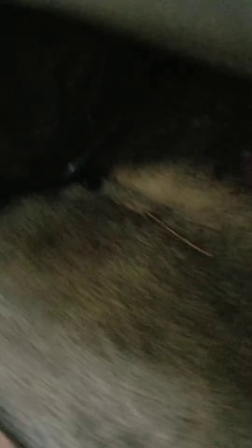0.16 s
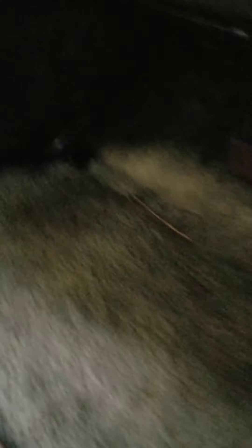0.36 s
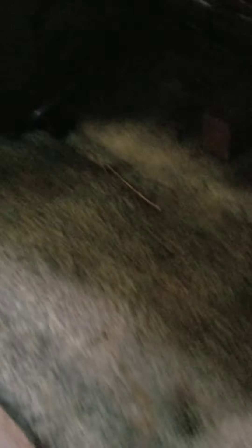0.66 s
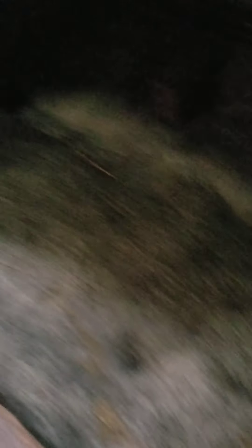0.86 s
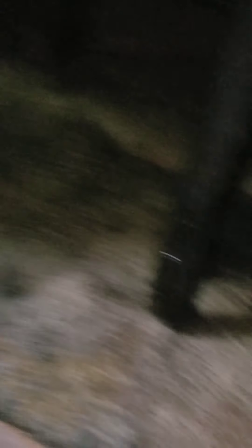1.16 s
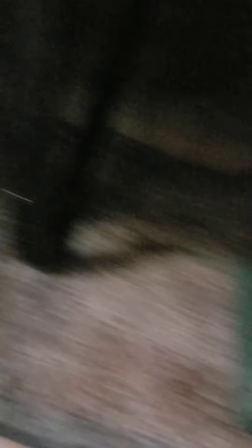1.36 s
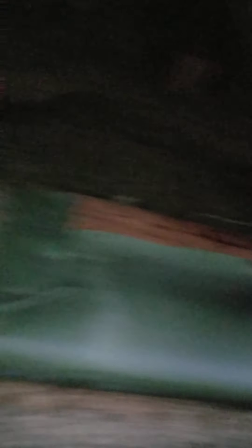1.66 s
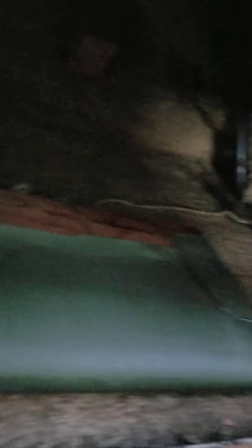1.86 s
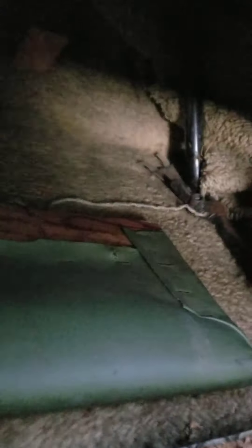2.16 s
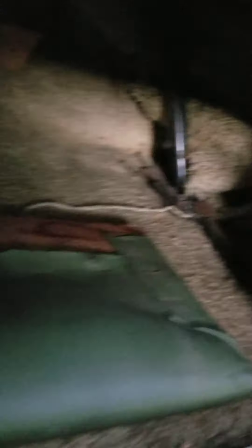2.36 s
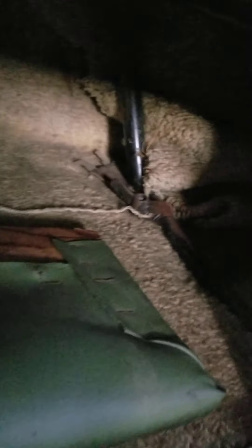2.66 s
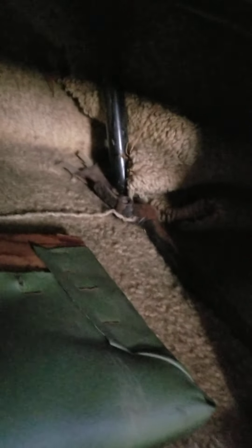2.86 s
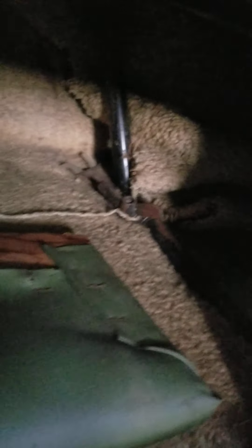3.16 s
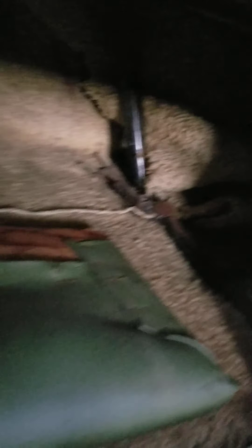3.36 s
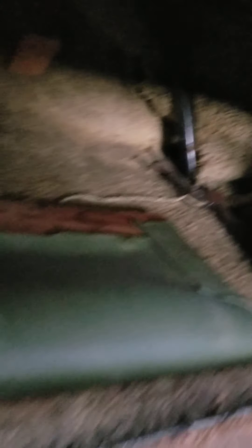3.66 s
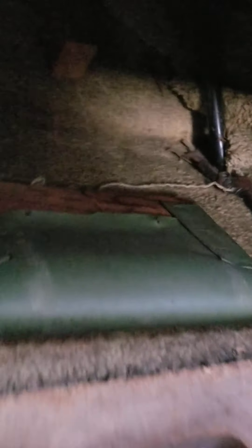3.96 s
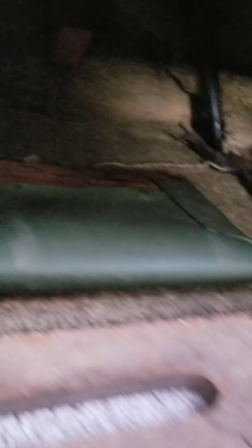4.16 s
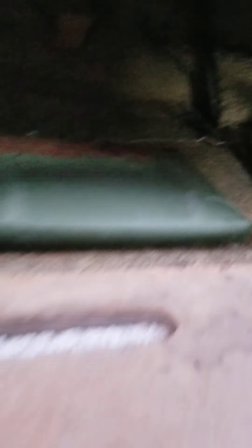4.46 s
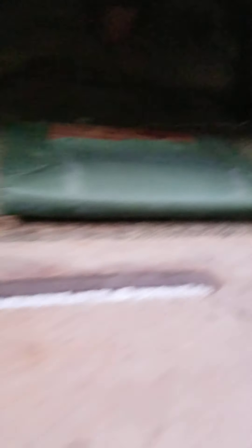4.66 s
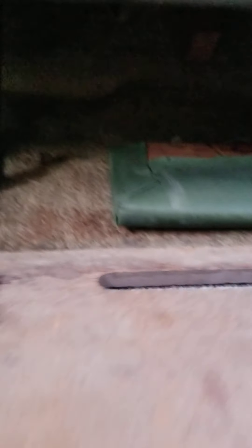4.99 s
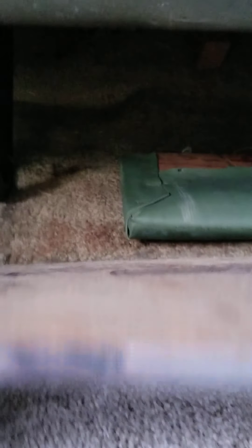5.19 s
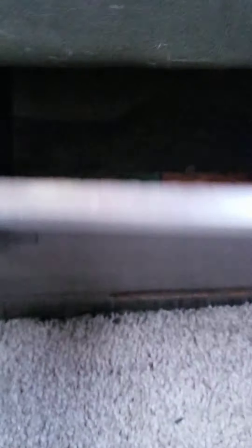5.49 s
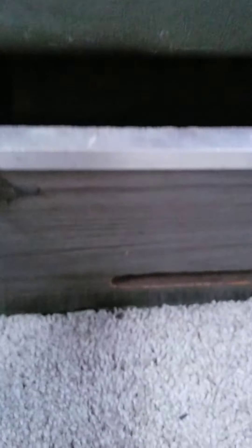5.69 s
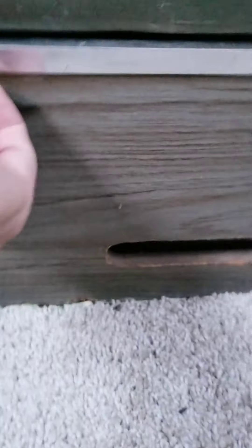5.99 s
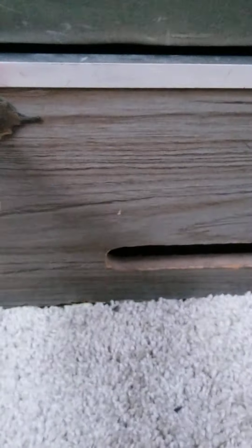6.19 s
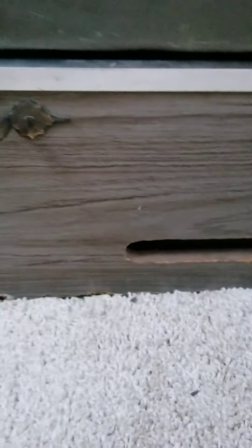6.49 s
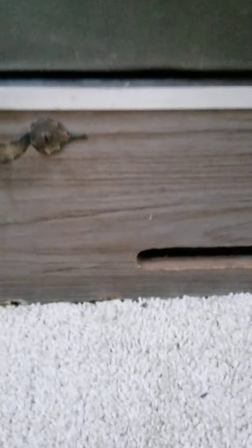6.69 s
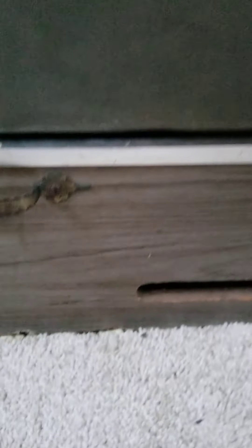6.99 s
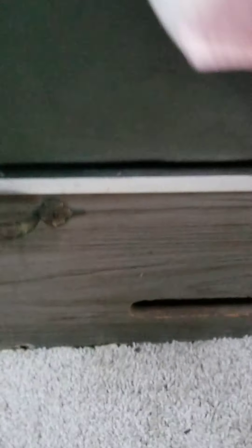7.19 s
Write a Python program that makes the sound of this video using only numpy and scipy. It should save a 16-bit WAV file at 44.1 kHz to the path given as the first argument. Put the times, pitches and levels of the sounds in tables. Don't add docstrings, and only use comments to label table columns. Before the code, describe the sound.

Inside a van, a four-cylinder air-cooled engine idles behind, a low booming rumble with busy knocking, tappet ticks and soft fan hiss. Fingers tap the phone's case near three seconds. The phone is drawn out of a low locker, then a wooden flap slams very close with a boomy thud and latch click. The idle continues, suddenly quieter as the phone lowers its gain.

```python
import sys
import numpy as np
from scipy import signal
from scipy.fft import rfft, irfft
from scipy.io import wavfile
from scipy.ndimage import uniform_filter1d

SR = 44100
rng = np.random.default_rng(int(sys.argv[2]) if len(sys.argv) > 2 else 0)


def waveform_to_disk(signal):
    frames = np.transpose(np.atleast_2d(signal))
    scaled = np.clip(frames, -1, 1) * 32767
    samples = np.round(scaled).astype(np.int16)
    wavfile.write(sys.argv[1], SR, samples)


def how_loud(loudness_db):
    steps = np.asarray(loudness_db, float) / 20
    return 10 ** steps


N = 323694
T = np.arange(N) / SR


def level(x, db=0):
    return x * how_loud(db) / np.sqrt(np.mean(x ** 2))


def ring(x, hz, width_hz):
    return signal.lfilter(*signal.iirpeak(hz, hz / width_hz, SR), x)


def colour(x, shape):
    hz, db = np.transpose(shape)
    bins = np.arange(N // 2 + 1) * SR / N + 1
    gain_db = np.interp(np.log(bins), np.log(hz), db, left=-90, right=-90)
    return irfft(rfft(x) * how_loud(gain_db), N)


def soften(x, hz):
    return signal.sosfiltfilt(signal.butter(3, hz, fs=SR, output="sos"), x)


def pair(alike):
    mid, side = rng.standard_normal((2, N))
    alike = np.clip(alike, 0, 1)
    shared = np.sqrt((1 + alike) / 2) * mid
    opposed = np.sqrt((1 - alike) / 2) * side
    return shared + opposed * np.array([[1], [-1]])


def pan(db):
    return how_loud(np.array([[db], [-db]]) / 2)


def strikes(seconds, size, lead_s=0):
    length = N + int(lead_s * SR)
    at = np.round((np.asarray(seconds) + lead_s) * SR).astype(int)
    inside = (at >= 0) & (at < length)
    return np.bincount(at[inside], size[inside], length)


def fading(x, t60):
    return signal.lfilter([1], [1, -np.exp(-np.log(1000) / (t60 * SR))], x)


# time in seconds, crank speed in rpm.
IDLE_SPEED = [(0, 715.4), (.5, 763.1), (.7, 728), (1, 734.4), (1.2, 769.5), (1.8, 718.1), (2.5, 718.7),
              (3.2, 736.3), (3.4, 760.6), (3.8, 723), (4.9, 744.5), (5.5, 729.3), (6.1, 731.2),
              (6.3, 762.8), (6.5, 729.9), (7.4, 735)]


def crank(place, jitter_s):
    start_cycle = -.1345
    t = np.arange(-SR, N) / SR
    cycles = np.cumsum(np.interp(t, *np.transpose(IDLE_SPEED))) / (2 * 60 * SR)
    cycles = cycles - cycles[SR] + start_cycle
    turns = np.arange(-1, cycles[-1] + 1)[:, None] + np.asarray(place)
    return np.interp(turns, cycles, t, right=99) + jitter_s * rng.standard_normal(turns.shape)


FIRING_PLACES = [-0.021, 0.239, 0.485, 0.734]
# Hz, width in Hz, level in dB, push of cylinders one to four from -1 to 1.
CABIN_BOOMS = [(49.9, 9.4, -36.8, -0.26, 0.09, -0.82, -1.0), (57.5, 37.2, -46.4, 0.24, -1.0, 0.44, 0.01),
               (88.6, 7.8, -32.6, 0.83, 0.39, 0.68, 1.0), (96.4, 7.8, -33.4, 0.05, -0.4, -0.41, -1.0),
               (107.4, 12.9, -34.1, 0.02, 0.18, 0.18, 1.0), (118.4, 7.8, -40.9, -0.67, -0.23, -1.0, -0.71),
               (131.0, 13.9, -48.8, -1.0, 0.66, 0.06, -0.94), (187.0, 7.8, -51.0, -0.08, -0.31, 0.05, -1.0),
               (190.5, 54.6, -61.3, -1.0, 0.83, -0.14, -0.2), (262.8, 11.9, -60.0, -0.05, 0.4, -0.0, 1.0)]
TAILPIPE_BOOM = (25, 8, -54, 1, 1, 1, 1)
# Hz, gain in dB.
BOOM_BALANCE = [(15, -1.5), (45, -0.5), (62, 1.5), (78, 1.5), (100, -2.5), (125, 1), (170, -1.5), (260, 2.5),
                (400, -3.5), (800, -30)]


def boom():
    when = crank(FIRING_PLACES, 0.0005)
    strength = how_loud(1.0 * rng.standard_normal(when.shape))
    out = 0
    for hz, width, db, *push in [TAILPIPE_BOOM, *CABIN_BOOMS]:
        own = how_loud(0.5 * rng.standard_normal(when.shape))
        size = how_loud(db) * strength * own * push
        puffs = strikes(when.ravel(), size.ravel(), 0.15)
        out = out + ring(puffs, hz, width)[-N:]
    return level(signal.lfilter(*signal.butter(2, 30, "high", fs=SR), colour(out, BOOM_BALANCE)))


def cabin_low():
    trim = level(soften(ring(pair(0.93), 133.4, 83), 390), -13)
    seat = level(ring(pair(0.73), 79, 1.3), -20.5)
    low = boom() * pan(1.6) + (trim + seat)
    low[0] = np.pad(low[0], (6, 0), "edge")[:N]
    return level(low, 1.86)


# time in seconds, share of the way 0-1.
DRAWN_OUT = [
    (3.7, 0),
    (4.5, .45),
    (5.1, .7),
    (5.7, 1),
]


def away():
    return np.interp(T, *np.transpose(DRAWN_OUT))


def body(modes, when, db, scatter_db, spread_s, buzz_db, alike, top_hz):
    size = how_loud(db + scatter_db * rng.standard_normal(when.shape)).ravel()
    apart = spread_s * rng.standard_normal(when.size)
    blows = np.array([strikes(when.ravel() + apart, size), strikes(when.ravel() - apart, size)])
    drive = level(blows) + level(pair(alike), buzz_db)
    out = 0
    for k, (hz, width, g) in enumerate(modes):
        out = out + (-1) ** k * how_loud(g) * ring(drive, hz, width)
    return level(soften(out, top_hz))


# Hz, width in Hz, level in dB.
FLOOR_MODES = [(227, 22, -6), (255, 98, -4), (298, 35, -5), (405.5, 57.4, -0.5), (469, 28.2, 2.5),
               (504.3, 45, -3.5), (593.3, 28.5, -2), (628, 64.6, -6.5)]


def floor_panel(when, db):
    panel = body(FLOOR_MODES, when - .004, db, 2.2, .00004, -3, 0.85, 1200)
    return level(panel * pan(1.6), 0.28)


# Hz, width in Hz, level in dB.
LID_MODES = [(786.6, 60, 1.5), (880, 151, -3)]
# Hz, width in Hz, level in dB.
SHROUD_MODES = [(959, 48, 5.5), (1150, 77, -19.5)]


def engine_lid(when, lid_db, shroud_db):
    lid = body(LID_MODES, when, lid_db, 1.5, .00012, -9, .5, 1200)
    shroud = body(SHROUD_MODES, when - .0032, shroud_db, 1.5, .00014, -10, .5, 1400)
    shroud = level(ring(shroud, 955, 190))
    both = lid * how_loud(-0.5 * away()) + shroud * how_loud(-1.5 + 3.5 * away())
    return level(both * pan(0.46), 0.82)


# Hz, width in Hz, dB over the hiss.
FAN_WHISTLES = [(1756, 21, -4.5), (2063, 36, 1.5), (3275, 140, 7), (4640, 520, 3)]
# Hz, density in dB per Hz.
FAN_SPECTRUM = [(680, -31), (1150, 1.5), (1220, -6.5), (1360, -4.5), (2060, -5), (2270, -9), (2550, -12),
                (3220, -23.5), (3700, -18), (4640, -22), (6640, -29.5), (7030, -47.5), (8000, -50),
                (10400, -72.5), (17600, -120)]


def fan_air(when, gas_db):
    size = how_loud(gas_db + 3.5 * rng.standard_normal(when.shape))
    pulses = fading(strikes(when.ravel(), size.ravel()), 0.05)
    gas = pair(0.052) * (pulses + how_loud(-2.5))
    air = soften(gas, 2800) + how_loud(2.5) * pair(0.069)
    whistles = sum(how_loud(db) * ring(air, hz, width) for hz, width, db in FAN_WHISTLES)
    return level(colour(air + whistles, FAN_SPECTRUM))


# place in the cycle 0-1, level in dB.
TAPPET_TICKS = [(.993, 0), (.025, -8), (.215, -4), (.27, -7), (.485, -8), (.725, -6), (.33, -9), (.60, -9)]
# Hz, width in Hz, level in dB.
TAPPET_MODES = [(3020, 410, 2.5), (4500, 1100, -2.5), (5800, 270, -22.5)]


def tappets():
    place, db = np.transpose(TAPPET_TICKS)
    when = crank(place, 0.0022)
    size = how_loud(db + 3.5 * rng.standard_normal(when.shape))
    ticks = pair(0.07) * fading(strikes(when.ravel(), size.ravel()), 0.047)
    out = sum(how_loud(g) * ring(ring(ticks, hz, width), hz, 2 * width) for hz, width, g in TAPPET_MODES)
    return level(out, -16.0) * how_loud(3 * away())


# place in the cycle 0-1, then levels in dB
VALVE_KNOCKS = [(.014, 1, -7, -1, 3), (.045, -7, -12, -9, 1), (.078, -4, -9, -6, -6),
                (.165, -5, -18, -18, -8), (.262, 0, -9, -12, 3), (.280, -4, -2, -4, 1),
                (.315, -6, -5, -8, -2), (.352, -8, -9, -7, -3), (.418, -14, -13, -13, -8),
                (.49, -4, -16, -16, 0), (.535, -8, -11, -3, 0), (.572, -7, -11, -6, -4),
                (.60, -8, -14, -11, -4), (.69, -5, -18, -18, -8), (.768, -4, -10, -9, 2),
                (.785, -6, -6, 0, -2), (.815, -5, -11, -15, -4), (.832, -8, -10, -4, -1)]


def valve_gear():
    place, panel_db, lid_db, shroud_db, gas_db = np.transpose(VALVE_KNOCKS)
    when = crank(place, 0.00046)
    panel = floor_panel(when, panel_db)
    lid = engine_lid(when, lid_db, shroud_db)
    hiss = fan_air(when, gas_db) + tappets()
    return panel, lid, level(hiss * pan(-3.5), 0.97)


# time in seconds, level in dB, t60 in seconds, brightness in dB.
SLAM_CONTACTS = [
    (5.832, -16.5, 0.044, -12),
    (5.8382, -16.5, 0.034, -9),
    (5.842, -17.5, 0.03, -21.5),
    (5.853, -25.5, .05, -20.5),
]
# time in seconds, level in dB.
LATCH_ON_EDGE = (6.0818, -24)
# Hz, level in dB, t60 in seconds (at most 0.06 is used).
EDGE_MODES = [(1728, -44, 5.0), (2390, -1.5, 0.045), (2912, -5, 0.034), (3268, 0, 0.029), (3978, -18, 0.16),
              (4161, -17, 0.17), (4613, -7.5, 0.1), (6500, -15, 0.048)]


def edge():
    u = np.arange(int(.1 * SR)) / SR
    rings = 0
    for hz, db, t60 in EDGE_MODES:
        rings = rings + how_loud(db) * np.sin(2 * np.pi * hz * u) * 1000 ** (-u / min(t60, .06))
    out = np.zeros((2, N))
    for s, db, *_ in [*SLAM_CONTACTS, LATCH_ON_EDGE]:
        for port, lag_s in enumerate((0, .00012)):
            out[port, int((s + lag_s) * SR):][:len(u)] += how_loud(db - 6) * rings
    return out


# Hz, density in dB per Hz.
WOOD_CRACK = [(150, -22), (250, 2.5), (516, -1.5), (670, -10.5), (1050, -10), (1340, -19.5), (2270, -11.5),
              (2400, -5.5), (4230, -13), (4680, -2), (5410, -41), (6160, -16.5), (8000, -87),
              (10400, -58.5), (17600, -120)]
# Hz, density in dB per Hz.
METAL_STRIP = [(3530, -30), (6000, 2), (7840, -16), (9480, -13.5), (10300, -7.5), (11200, -12),
               (13400, -3.5), (15800, -16)]


def cracks():
    wood = level(colour(pair(0.26), WOOD_CRACK))
    metal = level(colour(pair(0.07), METAL_STRIP))
    out = 0
    for s, db, t60, bright_db in SLAM_CONTACTS:
        burst = fading(strikes([s], how_loud([db])), t60)
        out = out + burst * (wood + how_loud(bright_db) * metal)
    return out


# time in seconds, level in dB, t60 in seconds.
LATCH_BLOWS = [
    (5.851, -15.5, 0.078),
    (5.868, -26, 0.1),
    (5.893, -31.5, .12),
    (5.911, -34, 0.087),
    (6.0812, -26, 0.024),
    (6.087, -31, 0.099),
]
# Hz, density in dB per Hz.
FRAME_SPECTRUM = [(200, -4.5), (330, 4.5), (520, 3), (900, -5), (2280, -10.5), (3700, -17), (6000, -22),
                  (8000, -38), (12500, -31), (16000, -41.5)]


def latch():
    frame = level(colour(pair(0.74), FRAME_SPECTRUM))
    out = 0
    for s, db, t60 in LATCH_BLOWS:
        blow = fading(strikes([s], how_loud([db])), t60)
        out = out + uniform_filter1d(blow, size=24) * frame
    return out


# Hz, level in dB, swell in seconds.
FLAP_BOOMS = [(125.5, -7, 0.012), (132, -9.5, 0.02), (89, -16.5, 0.019), (177.4, -11, 0.015),
              (331, -21.5, .014), (538, -24, 0.012), (572, -37, 0.026), (760, -30, .011), (229, -24, .025)]


def air_cushion():
    u = np.maximum(T - SLAM_CONTACTS[0][0], 0)
    out = 0
    for hz, db, swell in FLAP_BOOMS:
        envelope = (u / swell) ** 2 * np.exp(2 - u / swell) / 4
        out = out + how_loud(db) * envelope * np.cos(2 * np.pi * hz * (u - .0370))
    return out


# time in seconds, pitch in Hz, level in dB.
HINGE_SQUEAK = [
    (5.900, 5640, -54),
    (5.905, 5620, -40.5),
    (5.914, 5670, -40),
    (5.919, 5695, -50),
    (5.945, 5860, -58),
]


def hinge():
    s, hz, db = np.transpose(HINGE_SQUEAK)
    rub = level(uniform_filter1d(rng.standard_normal(N), int(.002 * SR)))
    tone = np.sin(2 * np.pi * np.cumsum(np.interp(T, s, hz)) / SR)
    return how_loud(np.interp(T, s, db, left=-120, right=-120)) * (1 + 1.4 * rub) * tone


def flap():
    return edge() + cracks() + latch() + air_cushion() + hinge()


# time in seconds, click in dB,
# thud in dB, left minus right in dB.
FINGER_TAPS = [(2.8274, -25, -9.5, 30), (2.8314, -27.5, -13.5, 27), (2.8334, -34.5, -6.5, 34),
               (2.837, -38, -33, 30), (2.8409, -40, -33, 22), (2.884, -51.5, -40, 0),
               (2.956, -48.5, -48, -12), (2.981, -42.5, -46, 22), (2.9920, -30.5, -38, 33.5),
               (2.9976, -27, -16, 18), (.355, -46.5, -55, 0), (4.955, -44.5, -55, -0.5),
               (.9105, -62.5, -66, 0), (1.199, -44.5, -47, -3), (7.301, -49, -22, 8),
               (7.306, -44.5, -43, -2)]
# Hz, density in dB per Hz.
CLICK_SPECTRUM = [(200, -10), (900, 0), (1800, 4), (3000, -4), (6000, -14.5), (7200, -36.5), (9000, -30),
                  (12000, -28), (16000, -35.5)]
# Hz, level in dB, t60 in seconds.
CASE_MODES = [(342, 4, 0.017), (614, 2.5, 0.01), (820, -41, 0.0065)]


def taps():
    out = np.zeros((2, N))
    crackle = level(colour(rng.standard_normal(N), CLICK_SPECTRUM))
    u = np.arange(int(.06 * SR)) / SR
    snap = np.exp(-u / 0.0014) - np.exp(-u / 0.00016)
    case = sum(how_loud(db) * np.sin(2 * np.pi * hz * u) * 1000 ** (-u / t60) for hz, db, t60 in CASE_MODES)
    case = case * (1 - np.exp(-u / 0.00044)) ** 2
    for s, click_db, thud_db, side_db in FINGER_TAPS:
        start = int(s * SR)
        room = min(len(u), N - start)
        click = how_loud(click_db) * crackle[start:start + room] * snap[:room]
        both = click + how_loud(thud_db) * case[:room]
        out[:, start:start + room] += both * how_loud(np.minimum([[side_db], [-side_db]], 0))
    return out


def duck():
    u = np.maximum(T - 5.872, 0)
    drop_db = -9 * (1 - np.exp(-u / 0.01))
    return how_loud(drop_db - 0.7 * u - 8.5 * np.exp(-T / 0.022))


# time in seconds, level in dB, fall in seconds.
HAND_BRUSHES = [(.25, -78.5, .15), (.66, -72, 0.27), (1.2, -75.5, .1), (1.45, -77.5, .1), (1.95, -75, .15),
                (3.0, -76, .1), (3.33, -75.5, 0.11), (3.8, -74, .15), (4.36, -78, .05), (5.1, -75, .1),
                (5.35, -69, .04), (5.525, -63.5, .025), (6.78, -81, .15), (7.26, -72.5, 0.48)]


def handling():
    power = how_loud(2 * (-76.5 - 9 * (T > 5.872)))
    for s, db, fall in HAND_BRUSHES:
        span = fall * np.where(T < s, 0.35, 1)
        power = power + how_loud(2 * db) * np.exp(-((T - s) / span) ** 2)
    return np.sqrt(power)


# Hz, density in dB per Hz.
PORT_HISS = [(4120, -39), (6500, -15), (8400, -20), (10300, -8.5), (12300, 0.5), (13500, -4.5),
             (15100, -5.5), (15700, -1)]


def rustle():
    flicker = how_loud(1.6 * level(uniform_filter1d(rng.standard_normal(N), int(.02 * SR))))
    cloth = level(colour(pair(.05), PORT_HISS)) * handling() * flicker * pan(-2.2)
    sleeve = level(ring(pair(.1), 3400, 2500), -82.0) * how_loud(13 * np.clip((T - 7.05) / .2, -9, 1))
    return cloth + sleeve


# boom, floor panel, engine lid, fan, in dB.
LOCKER_DB = (-26, -38.5, -44, -54)
DRAWN_OUT_DB = (-0.13, -6.5, -0.04, -1.5)
AFTER_SLAM_DB = (2, 0.6, -1.2, 0.5)


def scene():
    shut = T > SLAM_CONTACTS[0][0]
    parts = (cabin_low(), *valve_gear())
    sways_db = (.3, 0.64, 1.2, 0.32)
    out = taps() + flap()
    for part, inside, drawn, closed, sway in zip(parts, LOCKER_DB, DRAWN_OUT_DB, AFTER_SLAM_DB, sways_db):
        wander = level(soften(rng.standard_normal(N), 1 / .3))
        out = out + part * how_loud(inside + drawn * away() + closed * shut + sway * wander)
    return out


def top_cut(x):
    return signal.sosfilt(signal.butter(12, 15980, fs=SR, output="sos"), x)


def record(dry):
    limited = np.tanh(dry * duck() * 1.153) / 0.97
    return top_cut(limited + rustle())


dry = scene()
out = record(dry)
waveform_to_disk(out)
```